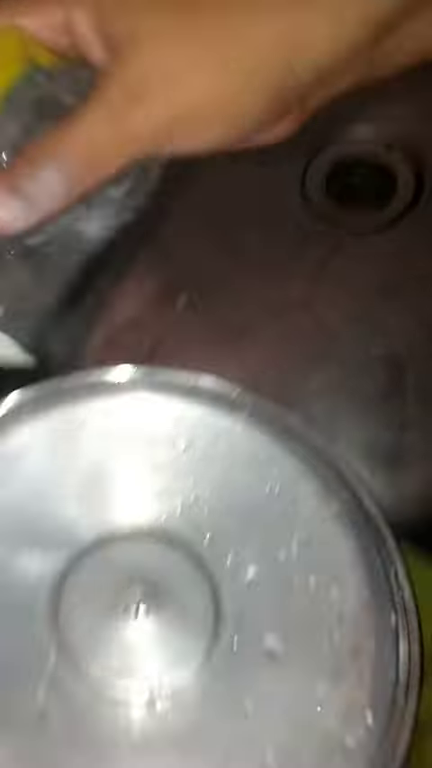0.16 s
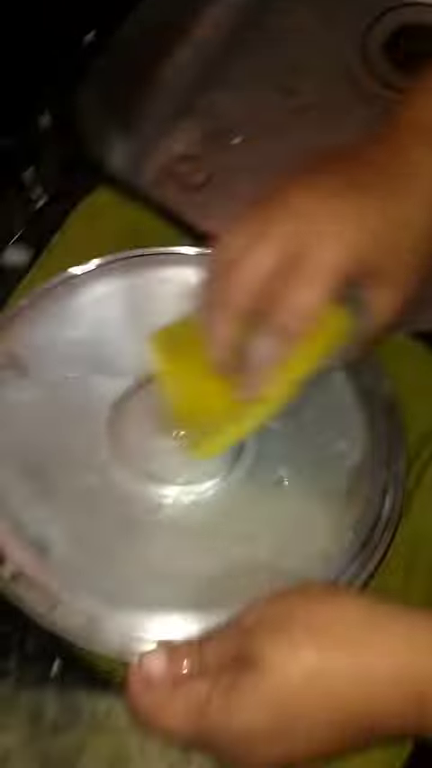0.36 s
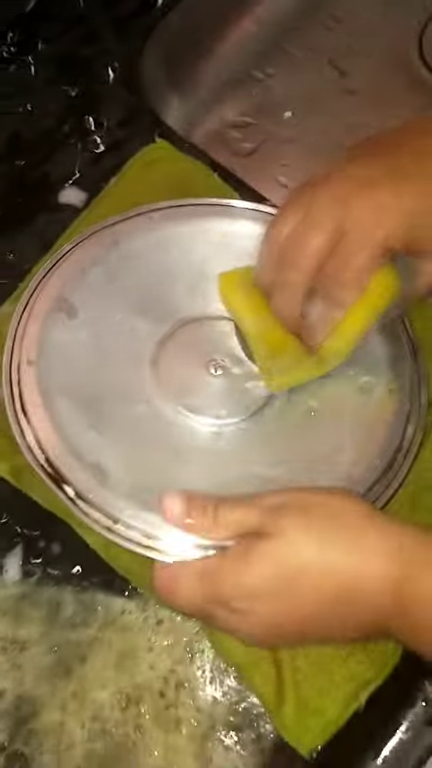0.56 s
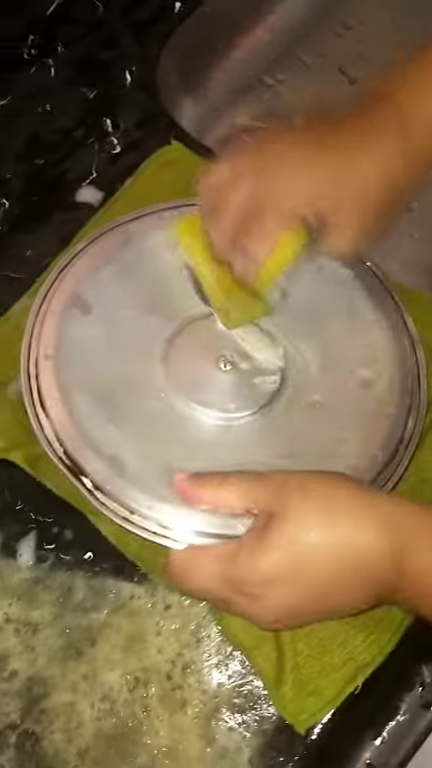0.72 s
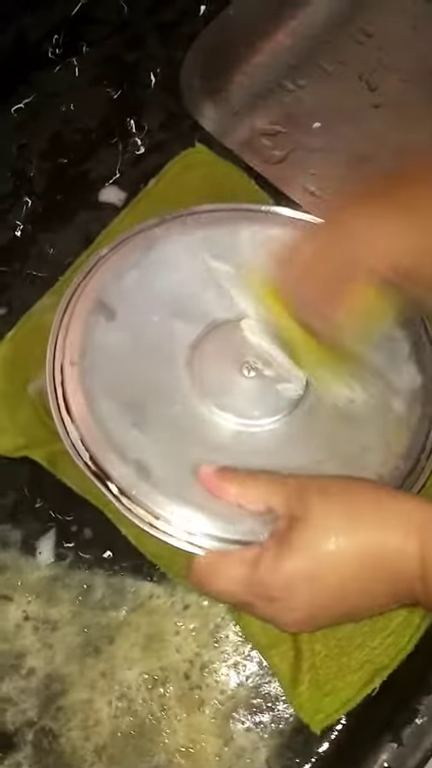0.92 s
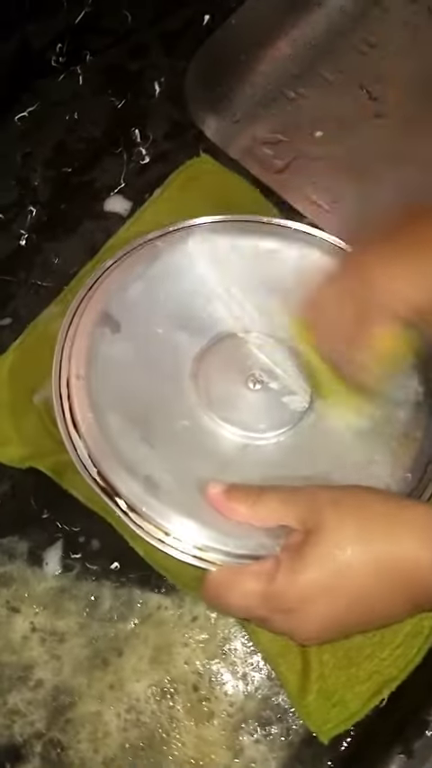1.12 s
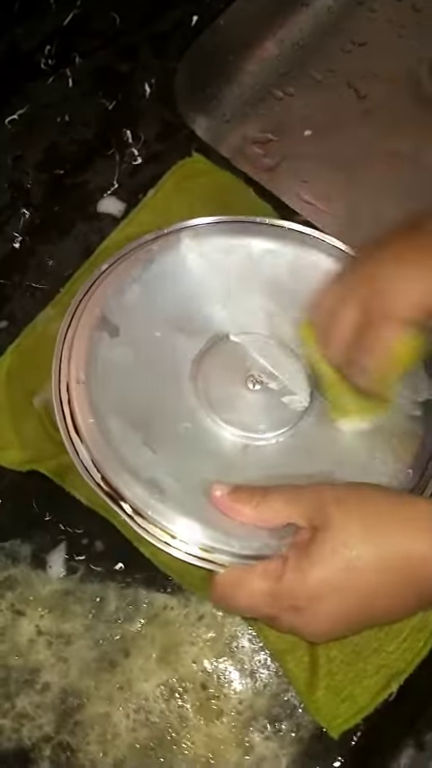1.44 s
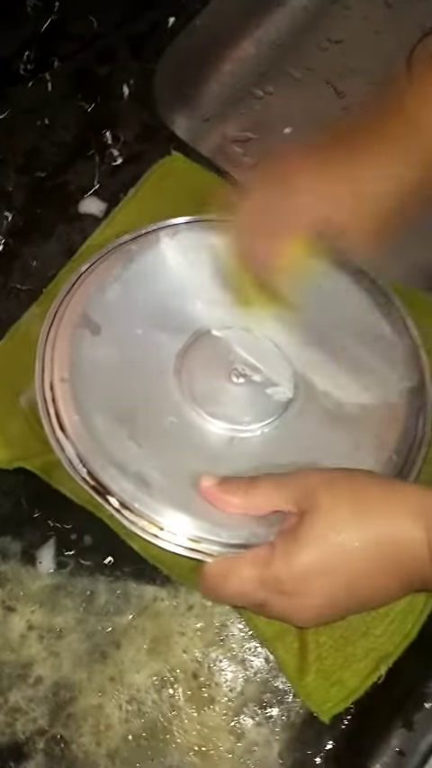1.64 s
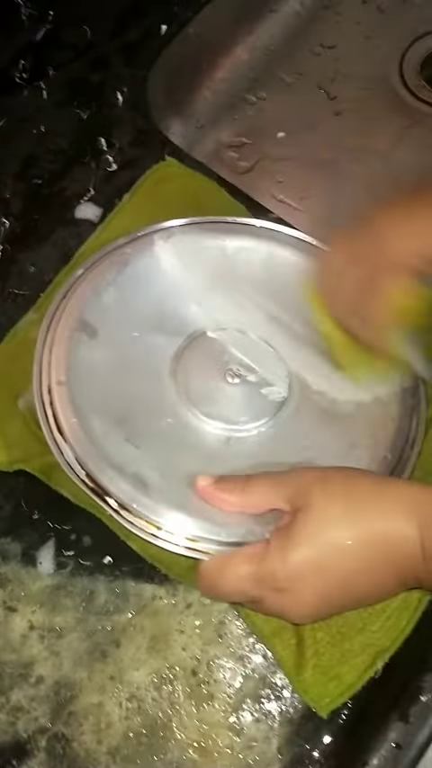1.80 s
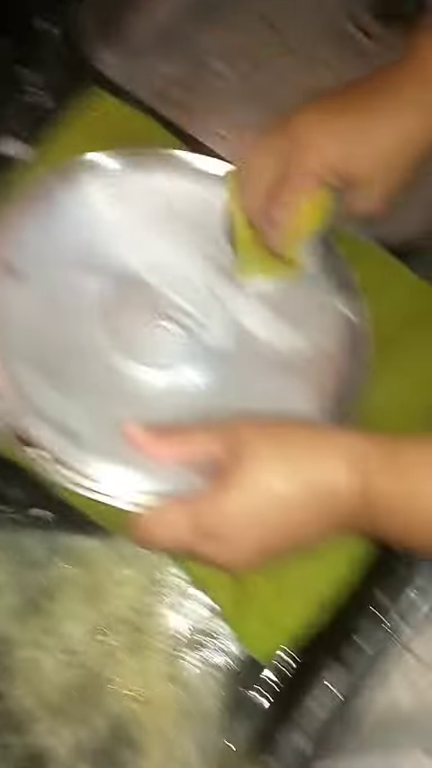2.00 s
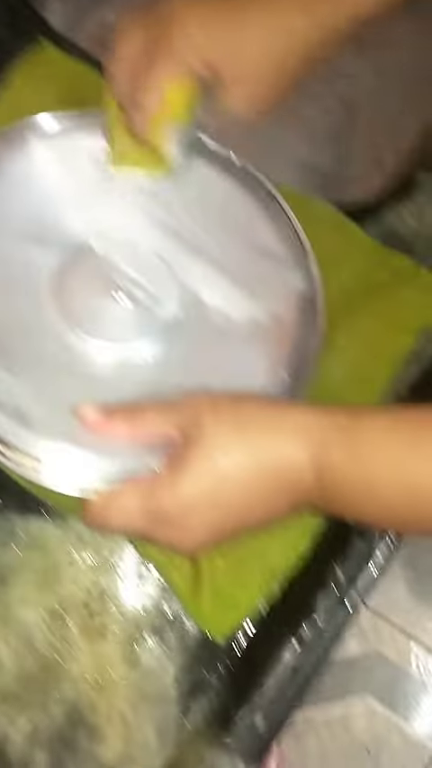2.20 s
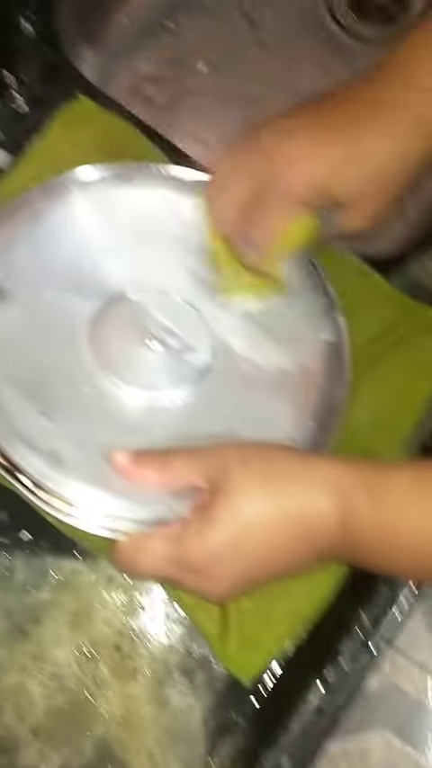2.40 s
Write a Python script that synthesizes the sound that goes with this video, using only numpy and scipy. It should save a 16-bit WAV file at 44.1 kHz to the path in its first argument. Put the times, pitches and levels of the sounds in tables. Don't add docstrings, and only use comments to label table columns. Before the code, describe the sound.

Fast scratchy scrubbing on a thin metal lid, with small rim rattles and a few early knocks

```python
import sys
import numpy as np
from scipy import signal
from scipy.fft import rfft, irfft
from scipy.io import wavfile
from scipy.ndimage import uniform_filter1d, minimum_filter1d

SR = 44100
rng = np.random.default_rng(int(sys.argv[2]) if len(sys.argv) > 2 else 0)


def generate_wav(sig):
    pcm = np.round(np.clip(np.atleast_2d(sig).T, -1, 1) * 32767).astype(np.int16)
    wavfile.write(sys.argv[1], SR, pcm)


def nominal_scale(level):
    x = np.asarray(level, float) / 20
    return 10 ** x


N = 112454

# [f/Hz, level/dB per Hz]
HUSH_SPECTRUM = [(15, -60.5), (25, -61), (79, 1), (92, -7.5), (114, 0.5), (202, -9), (283, -19),
                 (1940, -24.5), (7800, -35.5), (10100, -71), (17200, -120)]
# [f/Hz, width/Hz, level/dB]
COUNTER_MODES = [(157, 110, 4), (309.7, 107, 3.5), (399.5, 23, -4.5)]
# [t/s, peak level/dB, f/Hz, t60/s]
COUNTER_BUMPS = [(0.399, -37, 307, 0.041), (.398, -45, 187, 0.083), (.405, -47.5, 390.5, 0.16),
                 (.455, -57.5, 380, 0.11), (0.501, -56, 157, 0.14), (.573, -30, 177.6, 0.055),
                 (.592, -37, 156, 0.098), (.61, -45.5, 290, 0.062), (0.643, -44, 169, 0.044),
                 (0.691, -53, 166, 0.17), (0.811, -59, 172, 0.092), (.877, -45.5, 173, 0.085),
                 (.956, -50.5, 215.5, 0.17)]
# [edge t/s, other edge t/s, f/Hz, width/Hz, level/dB]
CLOTH_SLIDES = [(0.23, 0.72, 387, 78, -69.5), (.4, 0.53, 3020, 220, -73.5), (0.515, 0.612, 3170, 300, -74),
                (0.5, 0.4, 2200, 460, -67.5), (0.48, 0.68, 2400, 200, -76), (0.2, 0.75, 5130, 500, -86),
                (0.396, .43, 640, 200, -66.5), (.505, 0.56, 380, 79, -66.5), (.396, .41, 2400, 3300, -67),
                (.444, 0.453, 4100, 4000, -66), (0.667, .71, 1044, 180, -60.5),
                (.86, 0.965, 400, 200, -63.5), (.95, 1.09, 320, 220, -65), (2.03, 2.2, 323, 200, -67.5)]
# [f/Hz, level under a slip/dB, level under a knock/dB, t60/s]
LID_MODES = [(834, -12, 32.5, 0.059), (914, -11, 24.5, 0.046), (996, -7.5, 19, .05),
             (1100, -5.5, -2.5, 0.064), (1251, -5.5, 7, 0.21), (1328, 17, -56.5, 0.041),
             (1390, 11.5, -26, 0.057), (1453.4, 9, -18.5, 0.095), (1580, 2.5, -17.5, 0.03),
             (1740, -12.5, -23, 0.038), (2330, -37.5, -21.5, 0.014), (3230, -19, -40.5, .015)]
# [start t/s, end t/s, low modes level/dB, upper modes level/dB]
RIM_CHATTER = [(0.5, 0.555, -88, -61.5), (0.66, 0.701, -69.5, -72), (.995, 1.02, -50.5, -55.5),
               (1.014, 1.077, -51, -54), (1.1, 1.11, -50.5, -56), (1.107, 1.128, -48.5, -56),
               (1.154, 1.23, -60.5, -55), (1.263, 1.288, -60, -55.5), (1.386, 1.425, -53.5, -58),
               (1.448, 1.517, -59.5, -57), (1.54, 1.585, -54.5, -62), (1.59, 1.64, -60.5, -57),
               (1.692, 1.731, -57, -63), (1.743, 1.791, -59.5, -58.5), (1.972, 1.994, -55.5, -56),
               (1.987, 2.033, -51, -52), (2.041, 2.081, -53.5, -49.5), (2.096, 2.163, -61.5, -52),
               (2.256, 2.313, -57, -56.5), (2.397, 2.446, -57, -54), (2.53, 2.6, -59, -59)]
# [t/s, peak level/dB, f/Hz, width/ms]
LOW_RIM_TAPS = [(0.6777, -57, 1006, 2.7), (0.6837, -49.4, 980, 2.4), (0.6926, -51.5, 1003, 5.7),
                (0.9988, -49, 890, 4.1), (1.0293, -37, 903, 3.1), (1.0375, -39.0, 880, 3.6),
                (1.0534, -44.5, 887, 12), (1.1108, -47, 888, 2.7), (1.1228, -36, 864, 5.4),
                (1.2729, -38.5, 900, 3.4), (1.28, -48, 920, 2.5), (1.3998, -41.5, 904, 3.9),
                (1.4089, -44.5, 850, 5.3), (1.5459, -38.5, 925, 3.0), (1.5582, -44.5, 900, 6),
                (1.5691, -45.7, 848, 10.5), (1.792, -50.5, 926, 4.4), (1.9961, -42, 864, 9),
                (2.0099, -43.5, 890, 8.6), (2.0467, -37, 901, 3.9), (2.0552, -39, 959, 2.7),
                (2.061, -42.5, 931, 3.2), (2.0748, -46, 930, 2.6), (2.0798, -45, 850, 8.9),
                (2.2753, -47.5, 958, 2.5), (2.2783, -49, 980, 2.7), (2.2974, -44, 1027, 7.8),
                (2.4201, -48.5, 894, 3.5), (2.4313, -48.5, 905, 3.5), (2.4432, -46.3, 973, 3.5)]
# [t/s, peak level/dB, f/Hz, width/ms]
UPPER_RIM_TAPS = [(0.6886, -50, 1300, 2.5), (0.6969, -48.3, 1300, 4.1), (0.994, -43.5, 1383, 2.3),
                  (1.0291, -42, 1280, 7), (1.039, -43.5, 1320, 6.3), (1.0542, -42.5, 1326, 2.9),
                  (1.109, -41.5, 1460, 2.1), (1.1134, -40.5, 1430, 3.4), (1.17, -43.5, 1390, 2.5),
                  (1.181, -44, 1430, 3.6), (1.2139, -42.5, 1410, 1.9), (1.3463, -44.5, 1390, 2.7),
                  (1.426, -38, 1440, 2.4), (1.7115, -45, 1450, 3.5), (1.9947, -39.5, 1290, 5.8),
                  (2.01, -41.5, 1360, 3.1), (2.0478, -37, 1340, 2.9), (2.059, -35.9, 1320, 2.8),
                  (2.0714, -42.5, 1420, 2.4), (2.0898, -38, 1324, 2.6), (2.106, -36, 1393, 2.3),
                  (2.1155, -46, 1340, 6.1), (2.1262, -44.5, 1405, 8.8), (2.1429, -40, 1450, 2.7),
                  (2.1512, -42.5, 1364, 4.9), (2.2606, -43.5, 1355, 4.8), (2.279, -44, 1330, 3.6),
                  (2.2866, -38, 1340, 4.4), (2.4036, -43.5, 1420, 5.5), (2.411, -43, 1300, 2.9),
                  (2.4198, -42, 1310, 3.1), (2.4303, -45, 1390, 3.6), (2.4355, -40, 1350, 2.6),
                  (2.442, -41, 1370, 2.7)]
# [t/s, peak level/dB, contact/ms]
RIM_KNOCKS = [(.399, -44.5, 0.36), (.574, -44, 0.16), (.8735, -39.5, 0.077), (.876, -21.5, 0.2),
              (.884, -26, 0.31), (.9, -48, .3), (.918, -36, .3), (.955, -19, 0.26), (.9615, -31.5, 0.14),
              (.984, -35, 0.27), (.501, -57.5, .1), (1.862, -47, 0.13), (1.971, -45.5, 0.19),
              (2.046, -42, 0.17)]
# [f/Hz, level/dB]
SPLASH_SPECTRUM = [(1000, -9.5), (1500, 5.5), (2600, -8.5), (3600, -8.5), (6000, -24)]
# [start t/s, end t/s, grit level/dB, grip level/dB]
PAD_STROKES = [(.2, .395, -75, -82.5), (.395, .44, -71.5, -76), (.44, .645, -67.5, -67),
               (.665, .82, -61.5, -64.5), (.838, .968, -57, -56.5), (.982, 1.134, -56.5, -54.5),
               (1.145, 1.285, -54, -56), (1.297, 1.436, -56, -56), (1.446, 1.582, -53.5, -53),
               (1.592, 1.732, -56.5, -57), (1.742, 1.87, -55, -55), (1.886, 2.028, -55.5, -53.5),
               (2.04, 2.166, -53.5, -51.5), (2.18, 2.312, -55.5, -56.5), (2.33, 2.457, -54.5, -50),
               (2.468, 2.62, -55.5, -52.5)]
# [f/Hz, level/dB per Hz]
GRIT_SPECTRUM = [(290, -48.5), (500, -21), (696, -22), (797, -3.5), (1430, -8), (1730, -8.5), (4020, -12),
                 (7600, -20.5), (9880, -56.5), (16700, -120)]
# [f/Hz, width/Hz, inward level/dB, outward level/dB]
SHEET_MODES = [(2067, 260, -13, -15.5), (2410, 33, -14.5, -33.5), (2970, 200, -16.5, -21.5),
               (3583, 180, -16.5, -19), (3970, 130, -18, -18.5), (4460, 470, -16, -23.5),
               (5870, 170, -27.5, -18), (6030, 480, -14, -16.5), (7230, 300, -22, -25.5)]

HUSH_DB, HUM_HZ, HUM_WIDTH_HZ, HUM_DB = -67, 86.2, 10, -74
REVERB_DB, REVERB_T60_S = -15, 0.3
RUMBLE_DB = -68.5
LID_SILENT_UNDER_HZ = 690
CHATTER_PER_S, CHATTER_SPREAD_DB, CHATTER_EDGE_S = 1300, 1.8, 0.0059
TAP_RISE, TAP_FALL = 0.36, 0.56
SPLASH_DB, SPLASH_T60_S = -27.5, 0.075
STROKE_RISE_S, STROKE_FALL_S, STROKE_EASE, SPEED_UP_DB = 0.018, 0.022, 0.51, 1
TURN_S, TURN_DB = 0.041, -9
SLIPS_PER_S, SLIP_SPREAD_DB, JUDDER_DB = 1500, 0.5, 0.8
GRAINS_PER_S, GRAIN_SPREAD_DB = 16000, 0.5
SPLIT_HZ, BRIGHTEN, FULL_SPEED_DB = 3500, 0.3, -56
STALL, DRAG = 0.6, 0.37
PATCH_DB, SHEET_DRIFT_DB = 0.87, 3


def evened(x):
    return x / np.sqrt(np.mean(x ** 2) + 1e-20)


def colour(x, points):
    hz, db = np.transpose(points)
    bins_hz = np.fft.rfftfreq(N, 1 / SR)
    gain = nominal_scale(np.interp(np.log(bins_hz + 1), np.log(hz), db))
    return irfft(rfft(x) * gain, N)


def resonate(x, hz, width):
    r = np.exp(-np.pi * width / SR)
    pole = r * np.exp(2j * np.pi * hz / SR)
    return 2 * signal.lfilter([1 - r], [1, -pole], x).real


def clicks(per_s, spread_db):
    happens = rng.random(N) < per_s / SR
    size = nominal_scale(spread_db * np.minimum(rng.exponential(1, N), 4))
    return evened(happens * rng.choice([-1., 1.], N) * size)


def wander(size):
    once = uniform_filter1d(rng.standard_normal(N), size)
    return evened(uniform_filter1d(once, size))


def span(start, end, rise, fall):
    t = np.arange(N) / SR
    return np.clip((t - start) / rise, 0, 1) * np.clip((end - t) / fall, 0, 1)


def room_tone():
    hush = evened(colour(rng.standard_normal(N), HUSH_SPECTRUM))
    hush = hush * nominal_scale(HUSH_DB + wander(size=2000))
    hum = resonate(rng.standard_normal(N), HUM_HZ, HUM_WIDTH_HZ)
    hum = resonate(hum, HUM_HZ, HUM_WIDTH_HZ)
    return hush + nominal_scale(HUM_DB) * evened(hum)


def kitchen(x):
    t = np.arange(SR // 3) / SR
    tail = rng.standard_normal(len(t)) * nominal_scale(-60 * t / REVERB_T60_S) * (t > .004)
    return signal.oaconvolve(x, tail / np.linalg.norm(tail))[:N]


def bumps():
    out = np.zeros(N)
    t = np.arange(8000) / SR
    for s, db, hz, t60 in COUNTER_BUMPS:
        i = round(s * SR)
        decay = np.minimum(t / 0.0033, 1) * nominal_scale(db - 60 * t / t60)
        out[i:i + len(t)] += decay * np.sin(2 * np.pi * hz * t)
    return out


def slide():
    rub = rng.standard_normal(N) * nominal_scale(1.5 * wander(size=500))
    out = np.zeros(N)
    for a, b, hz, width, db in CLOTH_SLIDES:
        band = evened(resonate(resonate(rub, hz, width), hz, 2 * width))
        out += nominal_scale(db) * span(a, b, 0.16 * (b - a), 0.3 * (b - a)) * band
    return out


def lid(force, column):
    t = np.arange(5000) / SR
    ring = np.zeros(len(t))
    for mode in LID_MODES:
        hz, t60 = mode[0], mode[3]
        ring += nominal_scale(mode[column] - 60 * t / t60) * np.sin(2 * np.pi * hz * t)
    low_cut = signal.cheby2(5, 30, LID_SILENT_UNDER_HZ, "high", fs=SR, output="sos")
    ring = signal.sosfilt(low_cut, ring)
    return signal.oaconvolve(force, ring / abs(ring).max())[:N]


def chatter():
    low = lid(clicks(CHATTER_PER_S, CHATTER_SPREAD_DB), column=2)
    low = evened(colour(low, [(1100, 0), (1600, -14), (2500, -30)]))
    upper = evened(lid(clicks(CHATTER_PER_S, CHATTER_SPREAD_DB), column=1))
    out = np.zeros(N)
    for start, end, low_db, upper_db in RIM_CHATTER:
        run = span(start, end, CHATTER_EDGE_S, CHATTER_EDGE_S)
        out += run * (nominal_scale(low_db) * low + nominal_scale(upper_db) * upper)
    return out


def taps():
    out = np.zeros(N)
    t = np.arange(-1000, 2500) / SR
    for s, db, hz, width_ms in LOW_RIM_TAPS + UPPER_RIM_TAPS:
        scale = np.where(t < 0, TAP_RISE, TAP_FALL) * width_ms / 1000
        swell = nominal_scale(db - 1.5) * np.exp(-(t / scale) ** 2 / 2)
        swing = swell * np.sin(2 * np.pi * (hz * t + rng.random()))
        out[round(s * SR) - 1000:][:len(t)] += swing
    return out


def knocks():
    force, blows = np.zeros(N), np.zeros(N)
    t = np.arange(300) / SR
    for s, db, contact_ms in RIM_KNOCKS:
        i = round(s * SR)
        touch = t * np.exp(-t / (contact_ms / 2000 + 1e-5))
        force[i:i + len(t)] += nominal_scale(db) * touch / touch.sum()
        blows[i] += nominal_scale(db)
    t = np.arange(3000) / SR
    decay = np.minimum(t / 0.0012, 1) * nominal_scale(SPLASH_DB - 60 * t / SPLASH_T60_S)
    dying = signal.oaconvolve(blows, decay)[:N]
    splash = evened(colour(rng.standard_normal(N), SPLASH_SPECTRUM))
    return lid(force, column=2) + dying * splash


def strokes(column):
    t = np.arange(N) / SR
    out = np.zeros((2, N))
    for k, row in enumerate(PAD_STROKES):
        start, end = row[:2]
        speed_up = nominal_scale(SPEED_UP_DB * ((t - start) / (end - start) - 1))
        rub = span(start, end, STROKE_RISE_S, STROKE_FALL_S) ** STROKE_EASE * speed_up
        turn = nominal_scale(TURN_DB) * span(start - TURN_S, end + TURN_S, TURN_S, TURN_S)
        out[k % 2] += nominal_scale(row[column]) * np.maximum(rub, turn)
    return out


def grip():
    press = strokes(column=3).sum(0)
    slips = clicks(SLIPS_PER_S, SLIP_SPREAD_DB) * nominal_scale(JUDDER_DB * wander(size=500))
    shake = rng.standard_normal(N) * nominal_scale(0.56 * wander(size=900))
    shake = shake * (press / press.mean() + .0003) ** 0.18
    rumble = np.zeros(N)
    for hz, width, db in COUNTER_MODES:
        rumble += nominal_scale(db) * resonate(resonate(shake, hz, width), hz, 2 * width)
    return evened(lid(slips, column=1)) * press + nominal_scale(RUMBLE_DB) * evened(rumble)


def grit():
    grains = clicks(GRAINS_PER_S, GRAIN_SPREAD_DB)
    broad = evened(colour(grains, GRIT_SPECTRUM))
    body = signal.sosfiltfilt(signal.butter(1, SPLIT_HZ, fs=SR, output="sos"), broad)
    out, back = strokes(column=2)
    rub = out + back
    nearby_peak = -minimum_filter1d(-rub, size=3000)
    moving = (rub + 1e-9) / (nearby_peak + 1e-9)
    bright = (rub / nominal_scale(FULL_SPEED_DB)) ** BRIGHTEN * moving ** STALL
    body = body / moving ** DRAG
    sheet = np.zeros(N)
    for hz, width, in_db, out_db in SHEET_MODES:
        drift = nominal_scale(SHEET_DRIFT_DB * wander(size=1200))
        sheet += evened(resonate(grains, hz, width)) * drift * (back * nominal_scale(in_db) + out * nominal_scale(out_db))
    fizz = (broad - body) * bright * nominal_scale(PATCH_DB * wander(size=400))
    body = body * nominal_scale(PATCH_DB * wander(size=400))
    return (body + fizz) * rub + bright * sheet


def scene():
    near = slide() + chatter() + taps() + knocks() + grip() + grit()
    return (room_tone() + nominal_scale(REVERB_DB) * kitchen(near) + bumps() + near)[None]


def roll_off(x):
    return signal.sosfilt(signal.butter(12, 15630, fs=SR, output="sos"), x)


def record(dry):
    treble_cut = signal.firwin(121, 7870, window=("kaiser", 8), fs=SR)
    narrow = signal.oaconvolve(dry, treble_cut[None], "same")
    narrow = signal.sosfilt(signal.butter(1, 50, "high", fs=SR, output="sos"), narrow)
    rounding = nominal_scale(-95.5) * rng.standard_normal(dry.shape)
    return roll_off(narrow + rounding)


dry = scene()
out = record(dry)
generate_wav(out)
```